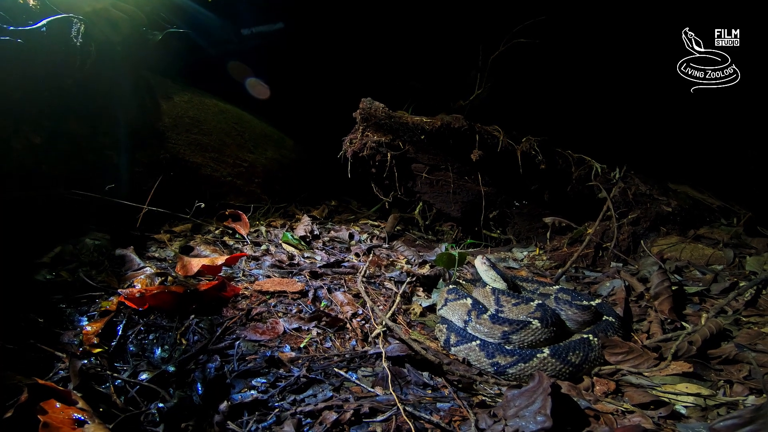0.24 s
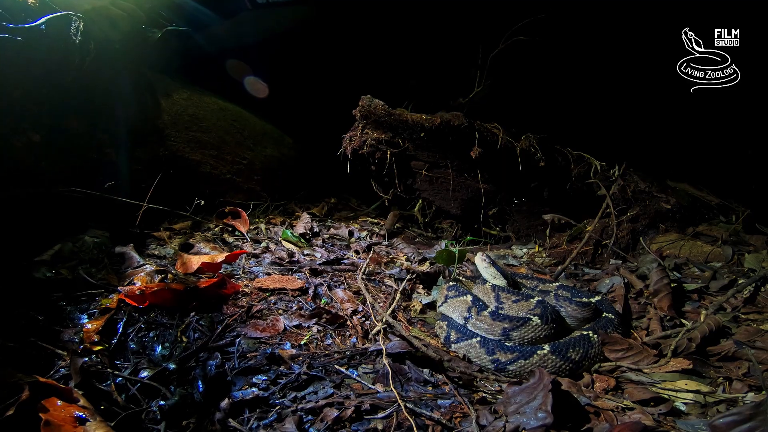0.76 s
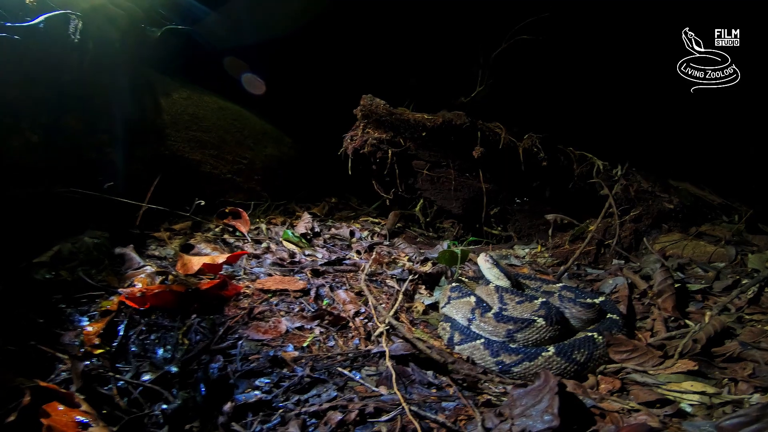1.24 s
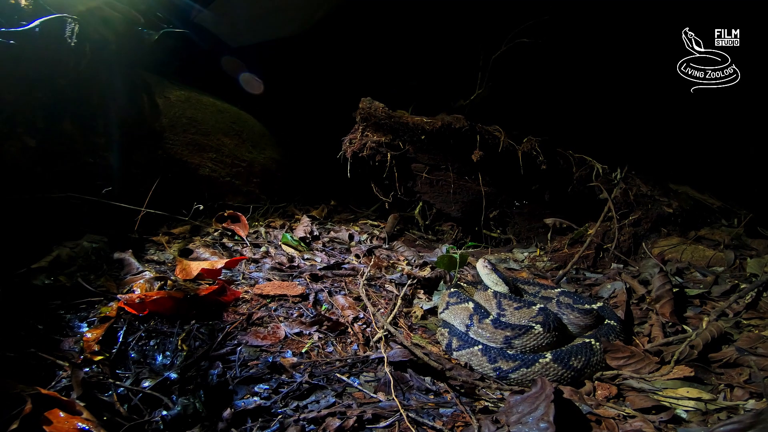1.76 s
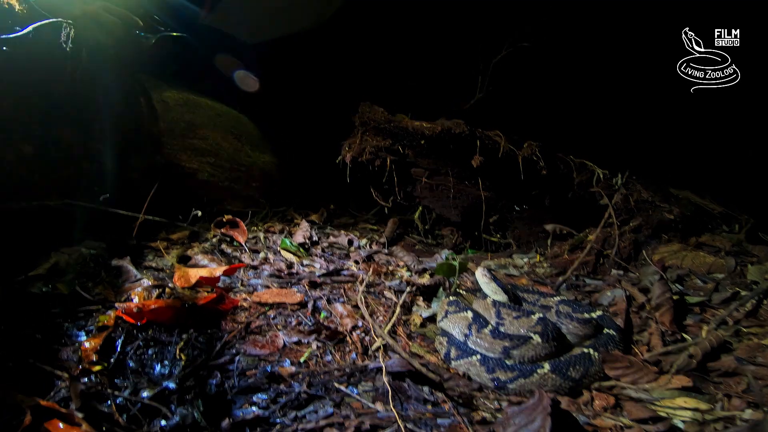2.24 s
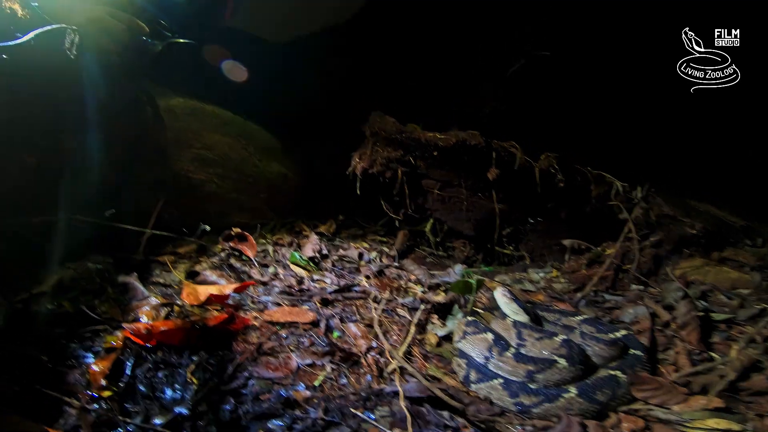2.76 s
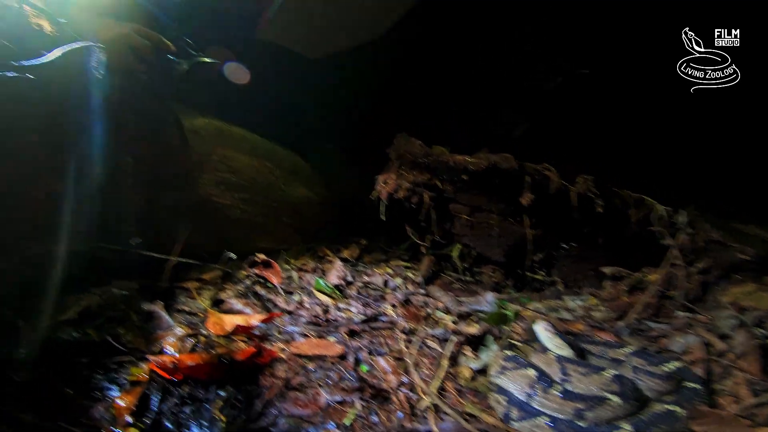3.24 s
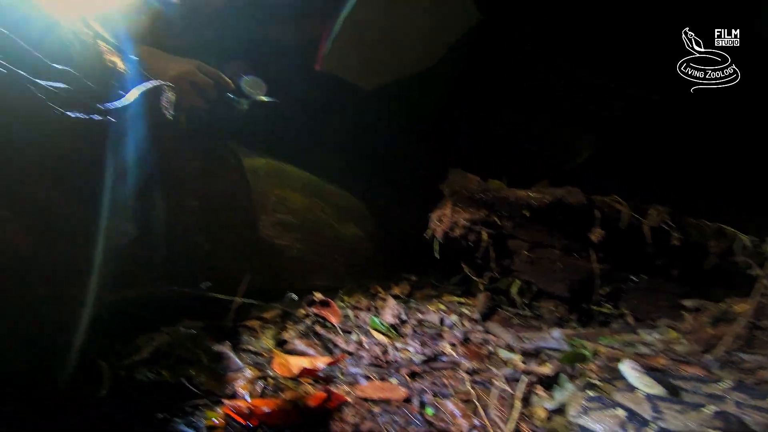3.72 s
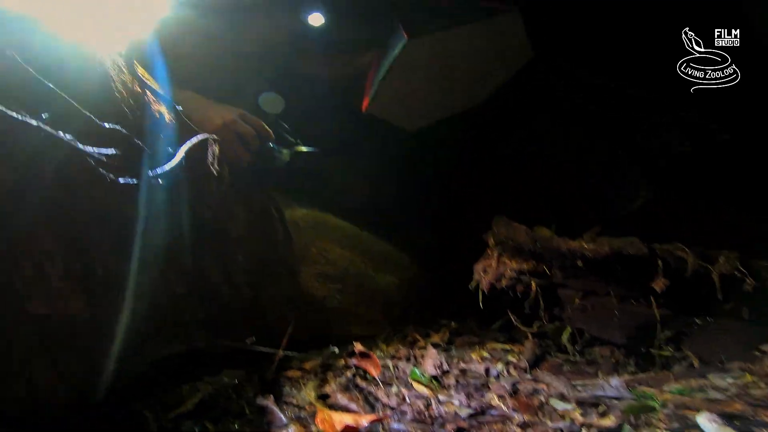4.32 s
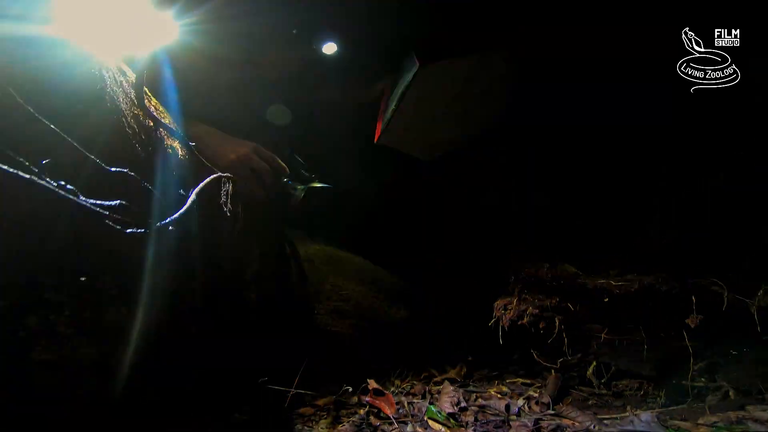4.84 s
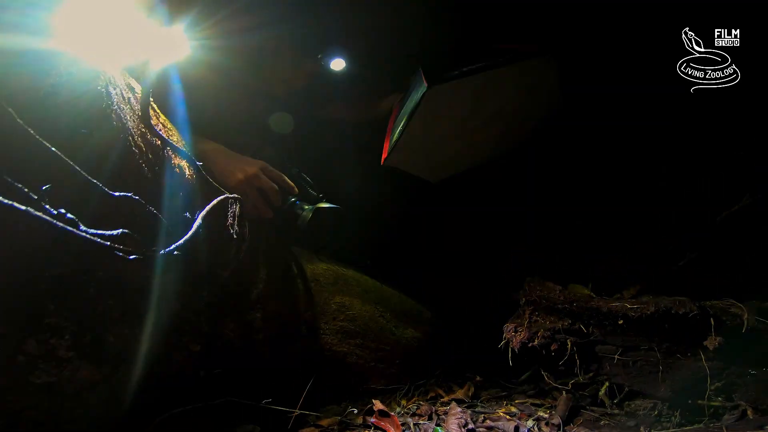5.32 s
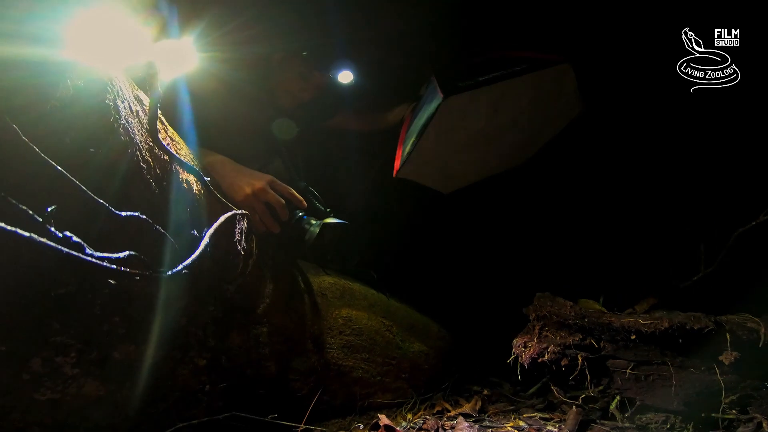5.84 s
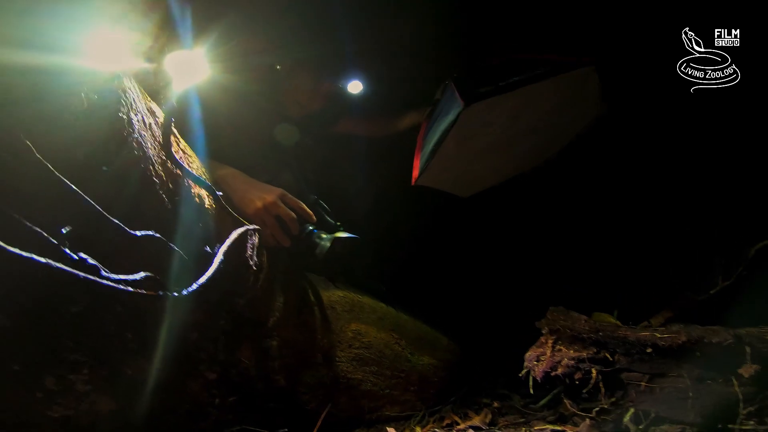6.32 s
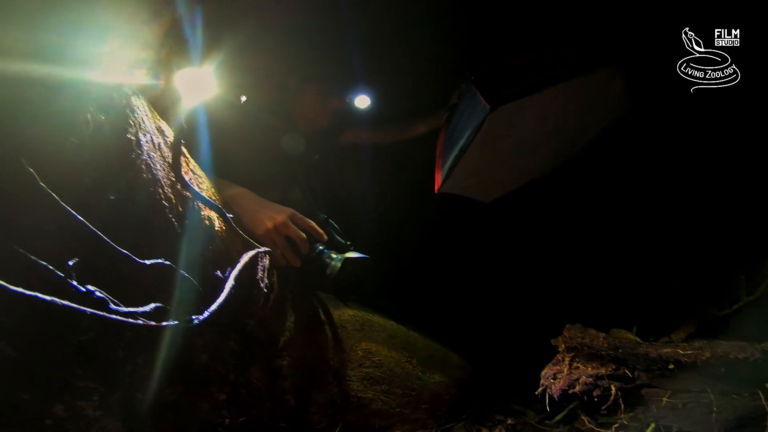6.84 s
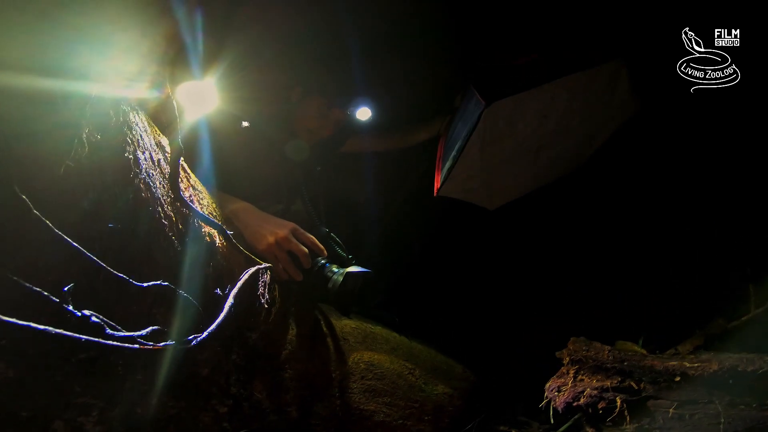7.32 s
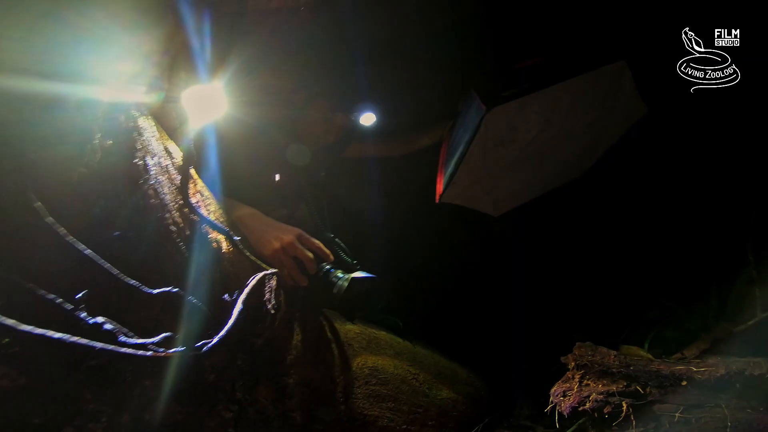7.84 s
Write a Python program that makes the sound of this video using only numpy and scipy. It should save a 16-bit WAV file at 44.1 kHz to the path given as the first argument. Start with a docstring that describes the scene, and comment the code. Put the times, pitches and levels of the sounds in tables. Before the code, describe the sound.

Short, bright frog peeps ring through the undergrowth, singly and in clusters, over pulsing cricket trills and a steady distant wash of night insects. Early on, just past the middle and near the end, a camera close to the microphone whirrs into focus, bumps softly and snaps its shutter. Faint high katydid rasps, thin whistled notes and a few tiny leaf ticks fill out the forest, heard in stereo.

```python
"""A rainforest floor at night, on a stereo microphone. Small frogs peep in the echoing undergrowth,
crickets trill with their wings, other singers whistle, and katydids rasp high above a dense far chorus.
Three times a stills camera close by focuses and fires: its motor whines, the mirror and shutter click,
and the body shakes the microphone."""
import sys
import numpy as np
from scipy import signal
from scipy.fft import rfft, irfft, next_fast_len
from scipy.io import wavfile
from scipy.ndimage import uniform_filter1d, map_coordinates

SR = 44100
rng = np.random.default_rng(int(sys.argv[2]) if len(sys.argv) > 2 else 0)


def put_to_file(sound):
    """Save the sound as 16-bit audio at rate SR, in the file named by the first command-line argument."""
    columns = np.atleast_2d(sound).T  # one column per channel
    safe = np.clip(columns, -1, 1)
    whole_steps = np.round(safe * 32767)
    wavfile.write(sys.argv[1], SR, whole_steps.astype(np.int16))


N = 356328
T = np.arange(N) / SR
SHOT_SIZE, LEAD_S = SR // 2, 0.3  # samples in one camera shot; how long before the release it starts


def amp(db):
    return 10 ** (np.asarray(db) / 20)


def unit(x):
    """x scaled to rms 1."""
    return x / np.sqrt(np.mean(x ** 2) + 1e-20)


def along(points, hz):
    """Reads (f/Hz, value) points at hz on a log frequency axis."""
    f, values = np.transpose(points)
    return np.interp(np.log(hz + 1), np.log(f + 1), values)


def curves(rows, t):
    """Each column after the time column, interpolated at times t."""
    times, *columns = np.transpose(rows)
    return [np.interp(t, times, column) for column in columns]


def wobble(rate):
    """A smooth random curve, rate knots a second."""
    return map_coordinates(rng.standard_normal(int(N * rate / SR) + 4), [T * rate])


def filtered(x, response):
    """x through a complex response of frequency."""
    size = next_fast_len(x.shape[-1] + 8192)
    return irfft(rfft(x, size) * response(np.fft.rfftfreq(size, 1 / SR)), size)[..., :x.shape[-1]]


def resonances(modes):
    """Causal response of (f/Hz, width/Hz, gain/dB) modes of alternating sign."""
    return lambda f: sum((-1) ** k * amp(db) * 1j * f * width / (hz * hz - f * f + 1j * f * width)
                         for k, (hz, width, db) in enumerate(modes))


def band(size, hz, width_hz):
    """Noise in a bell-shaped band, rms 1."""
    return unit(filtered(rng.standard_normal(size), lambda f: np.exp(-((f - hz) / width_hz) ** 2 * 2)))


def warble(size, hz, width_hz):
    """A tone of even level whose pitch trembles, rms 1."""
    start_phase = rng.random() * 2 * np.pi
    pitch = hz + width_hz * wobble(60)[:size]
    return unit(np.sin(start_phase + 2 * np.pi * np.cumsum(pitch) / SR))


def swell(size, edge):
    """A fade in and a fade out, each over the share edge of the length."""
    u = np.linspace(0, 1, size)
    return np.sin(np.pi / 2 * np.clip(np.minimum(u, 1 - u) / edge, 0, 1))


def echo(x, t60):
    """Trunks and leaves scatter the sound into a dense tail of energy 1."""
    t = np.arange(SR // 2) / SR
    tail = rng.standard_normal(len(t)) * amp(-60 * t / t60)
    return signal.fftconvolve(x, tail / np.linalg.norm(tail))


def add(track, s, x):
    """Mixes x into track from second s on."""
    part = track[..., round(s * SR):][..., :x.shape[-1]]
    part += x[..., :part.shape[-1]]


def rush(spectrum, patchy_db):
    """Stereo noise of rms 1 whose gain varies in random patches of time and frequency."""
    # likeness of the microphone's two sides: f/Hz, correlation
    likeness = [(30, 0.91), (120, 0.99), (300, 1), (600, 0.98), (1500, 0.99), (2500, 1), (8500, 1),
                (9500, 0.615), (15000, 0.43)]

    def mid_and_side(hz):
        angle = np.arccos(np.clip(along(likeness, hz), -1, 1)) / 2
        return amp(along(spectrum, hz)) * [np.cos(angle), np.sin(angle)]

    cells = signal.stft(rng.standard_normal((2, N)), nperseg=512)[2]
    patches = uniform_filter1d(rng.standard_normal(cells.shape[1:]), 3, axis=0)
    patches = uniform_filter1d(patches, 14, axis=1)
    pair = signal.istft(cells * amp(patchy_db * unit(patches)), nperseg=512)[1][:, :N]
    mid, side = filtered(pair, mid_and_side)
    return unit(np.array([mid + side, mid - side]))


def forest():
    """Far from the microphone, unseen singers blur into a patchy hiss over the low rustle of night air."""
    # slow drift of the distance: t/s, frog level/dB, chorus level/dB
    drift = [(0, -51, -48), (1, -59.5, -49), (4, -60.5, -49.5), (8.08, -55, -49.5)]
    # spectrum of the far chorus: f/Hz, relative density/dB
    chorus_spectrum = [(1180, -41.5), (2000, -25), (2490, -22.5), (2810, -14), (3500, -15), (4310, 3),
                       (5140, -3), (5370, -10), (5980, 1), (6330, -2.5), (6570, -12), (7310, -6),
                       (7840, -15), (8290, -60.5), (9000, -47), (11700, -67), (19800, -120)]
    # spectrum of the night air: f/Hz, relative density/dB
    air_spectrum = [(20, -120), (30, -13.5), (50, -2.5), (62, -7), (90, -6.5), (200, -1.5), (330, -4),
                    (450, -13), (620, -16), (1500, -19), (3000, -25.5), (8500, -28.5), (15700, -33.5)]
    frogs_db, chorus_db = curves(drift, T)
    far_frogs = amp(frogs_db + 4.1 * wobble(13)) * band(N, 4530, width_hz=480)
    chorus = amp(chorus_db) * rush(chorus_spectrum, patchy_db=2)
    air = amp(-65) * rush(air_spectrum, patchy_db=1.5)
    return far_frogs + chorus + air


def far_singers():
    """Distant voices that never stop, each a trembling tone in a narrow band of noise."""
    # held voices: f/Hz, width/Hz, level/dB
    singers = [(609, 41, -81.5), (2774, 150, -73), (3049, 57, -71), (3269, 58, -69.5), (3523, 50, -74),
               (5340, 22, -69), (5640, 24, -65.5), (5807, 62, -61.5), (7013, 150, -65.5)]
    out = np.zeros(N)
    for hz, width_hz, db in singers:
        level = amp(db + 1.1 * wobble(4.6))
        out += level * 0.7 * (warble(N, hz, width_hz / 2) + band(N, hz, width_hz))
    return out


def steady_cricket():
    """One cricket sings throughout, its wing strokes pulsing in steady groups."""
    groups = (1 + 0.3 * np.sin(2 * np.pi * 20 * T)) * (1 + 0.32 * np.sin(2 * np.pi * 45 * T))
    tone = band(N, 5030, width_hz=28) + 1.1 * warble(N, 5097, width_hz=11)
    return unit(groups * tone) * amp(-58.5 + 0.63 * wobble(1.8))


def cricket_trills():
    """Wing strokes chop a tone, huskier and more echoing the farther the cricket is from the microphone."""
    # trills of the nearer crickets: t/s, f/Hz, level/dB
    near = [(0.047, 6230, -45.5), (0.19, 6160, -49.5), (0.411, 6240, -50), (1.035, 6110, -52.5),
            (1.2, 6220, -54), (1.37, 6140, -55), (1.557, 6240, -48), (1.9, 6264, -46), (2.246, 6254, -47.5),
            (2.67, 6120, -53), (2.9, 6180, -51), (3.33, 6200, -61), (3.62, 6150, -48), (3.687, 6323, -44),
            (4.001, 6250, -48), (4.09, 6270, -46), (4.46, 6305, -45), (4.89, 6000, -50.5),
            (5.27, 6250, -53), (5.608, 6294, -43), (6, 6280, -45.5), (6.16, 6200, -57), (6.44, 6140, -50.5),
            (6.78, 6180, -53), (7.664, 6310, -45.5)]
    trill_s, strokes_per_s, far_count = 0.154, 51, 20
    far = zip(rng.uniform(0, N / SR, far_count),
              rng.normal(6190, 44, far_count),
              rng.normal(-56.5, 2.5, far_count))  # same columns, drawn at random
    out, t = np.zeros(N), T[:round(trill_s * SR)]
    for start, hz, db in [*near, *far]:
        blur = amp(min(-2 + 0.83 * (-46 - db), 5))  # husk and echo grow as the trill gets fainter
        strokes = np.clip(0.7 - np.cos(2 * np.pi * rng.normal(strokes_per_s, 0.41) * t), 0, 1.3)
        tone = np.sin(2 * np.pi * hz * t) + blur * band(len(t), hz, width_hz=110)
        trill = amp(db) * swell(len(t), edge=0.1) * unit(strokes * tone) / np.hypot(1, blur)
        add(out, start, trill)
        add(out, start, blur * echo(trill, t60=0.24))
    return out


def frogs():
    """Each peep starts high, flips down to a held pitch and hangs in the echoes; far ones start softly."""
    # peeps in the undergrowth: t/s, level/dB, held f/Hz, echo over the peep/dB
    peeps = [(0.069, -28, 4350, 0), (0.091, -27.5, 4337, 0.5), (0.287, -47, 4220, 8), (0.53, -41, 4385, 5),
             (0.7, -40, 4240, 4.5), (1.035, -24, 4335, 5.5), (1.638, -30, 4280, 2.5),
             (1.719, -34.5, 4250, 5.5), (1.8, -42, 4060, 9), (1.996, -23.5, 4094, -2.5),
             (2.668, -51.5, 4100, 12), (2.743, -46.5, 4430, 7), (2.979, -30.5, 4010, 5),
             (3.355, -44, 4350, 7), (3.48, -40, 4423, 7.5), (3.512, -42.5, 4050, 8.5),
             (3.741, -39, 4220, 6), (3.785, -31.5, 4306, 2), (4.071, -37, 4207, 9), (4.298, -40, 4410, 4.5),
             (4.707, -34, 4200, 4.5), (5.152, -41.5, 4360, 6), (5.179, -38, 3955, 6),
             (5.201, -31.5, 4004, 1), (5.25, -43.5, 3980, 8), (5.451, -25, 4350, 2), (5.475, -28, 4390, -1),
             (5.506, -25, 4197, 1), (5.672, -40.5, 4240, 6), (6.02, -43.5, 4295, 8), (6.07, -44, 4140, 7),
             (6.402, -37, 4100, 7), (6.806, -43.5, 4160, 8), (7.263, -41.5, 4415, 7.5),
             (7.423, -34.5, 4320, 7), (7.549, -29.5, 4375, 4), (7.693, -23.5, 4110, -2)]
    peep_s, peep_t60, trunk_delay_s = 0.038, 0.11, 0.019
    out, t = np.zeros(N), T[:round(peep_s * SR)]
    flip_hz = 190 * (1 - np.tanh((t - 0.006) / 0.0015))
    for s, db, hz, echo_db in peeps:
        phase = 2 * np.pi * np.cumsum(hz + flip_hz) / SR
        rise_s = 0.001 * amp(1.16 * echo_db)
        envelope = np.clip(t / rise_s, 0, 1) * swell(len(t), edge=0.023) * amp(-60 * t / peep_t60)
        peep = envelope * (np.sin(phase) + amp(-43) * np.sin(2 * phase))
        trunk_db = db - 5 + min(echo_db, 5.5)  # a trunk throws every peep back once
        add(out, s, amp(db) * peep)
        add(out, s + trunk_delay_s, amp(trunk_db) * peep)
        add(out, s + 0.003, amp(db + echo_db) * echo(peep, t60=0.42))
    return out


def whistles():
    """Short, breathy notes of single singers, heard directly and through the trees."""
    # whistled notes: t/s, length/s, f/Hz, level/dB before the direct and echo gains
    notes = [(0.415, 0.11, 2373, -61.5), (0.547, 0.045, 3280, -48), (0.78, 0.11, 2385, -62),
             (1.475, 0.021, 3290, -49), (5.38, 0.072, 2200, -71), (5.8, 0.087, 2220, -69),
             (6.39, .07, 2170, -65), (6.56, .08, 2116, -68), (7.058, 0.097, 2120, -71),
             (7.327, 0.081, 2130, -66), (7.452, 0.11, 2130, -67), (7.87, .09, 2120, -68)]
    out = np.zeros(N)
    for start, length, hz, db in notes:
        t = T[:round(length * SR)]
        tone = np.sin(2 * np.pi * hz * t) + 0.5 * band(len(t), hz, width_hz=89)
        note = amp(db) * swell(len(t), edge=0.22) * unit(tone)
        add(out, start, 0.48 * note)
        add(out, start, 0.38 * echo(note, t60=0.4))
    return out


def katydid_rasps():
    """Katydids scrape out bursts of high, throbbing hiss that arrive more as echo than directly."""
    # bursts: start t/s, end t/s, centre f/Hz, width/Hz, level/dB before the direct and echo gains
    rasps = [(0.97, 1.117, 15500, 700, -77.5), (1.633, 1.7, 13600, 900, -83),
             (1.756, 1.94, 15300, 900, -72.5), (1.947, 2.502, 14500, 2510, -80.5),
             (2.465, 2.74, 10500, 2200, -78.5), (3.33, 3.832, 12300, 4560, -66.5),
             (3.682, 3.9, 13100, 700, -80), (7.072, 7.354, 15500, 890, -75)]
    out = np.zeros(N)
    throb = 1 - 0.2 * np.cos(2 * np.pi * 10 * T)
    for start, end, hz, width_hz, db in rasps:
        size = round((end - start) * SR)
        add(out, start, amp(db) * swell(size, edge=0.3) * throb[:size] * band(size, hz, width_hz))
    return 0.63 * out + 0.85 * echo(out, t60=0.5)[:N]


def cricket_pips():
    """Slower wing strokes part a cricket's tone into five pips with a short echo."""
    # runs of pips: t/s, level/dB before the direct and echo gains
    runs = [(1.02, -61), (4.43, -61.5)]
    hz, pips_per_s = 3700, 27
    out, t = np.zeros(N), T[:round(5 / pips_per_s * SR)]
    strokes = np.clip(0.2 - np.cos(2 * np.pi * pips_per_s * t), 0, 1)
    for start, db in runs:
        tone = np.sin(2 * np.pi * hz * t) + 0.3 * band(len(t), hz, width_hz=58)
        pips = amp(db) * unit(strokes * tone)
        add(out, start, 0.85 * pips)
        add(out, start, 0.6 * echo(pips, t60=0.14))
    return out


def leaf_ticks():
    """Tiny dry ticks in the leaves: bright noise that dies at once."""
    # ticks: t/s, starting level/dB
    ticks = [(1.337, -57), (5.862, -61.5), (6.0033, -61)]
    out, size, t60 = np.zeros(N), 300, 0.006
    for s, db in ticks:
        add(out, s, amp(db - 60 * T[:size] / t60) * band(size, 12000, width_hz=6000))
    return out


def lens_motor():
    """The focus motor whirrs and whines through one shot, with a narrow band of gear noise."""
    # run of the motor: t/s from release, whirr level/dB, gear level/dB
    drive = [(-.28, -81, -94), (-.22, -43, -86), (-.17, -41.5, -41.5), (-.1, -39.5, -44),
             (-.04, -39.5, -53), (0.071, -40.5, -59), (.13, -91, -99)]
    # spectrum of the whirr: f/Hz, relative density/dB before the stereo mix
    spectrum = [(59, -48), (100, -8), (183, -7.5), (430, -29), (780, -24.5), (1200, -34), (2150, -38.5),
                (3710, -28.5), (4480, -4), (5210, -24.5), (5520, -7), (6180, -4), (6500, -13.5),
                (9000, -63.5), (11700, -96), (19800, -120)]
    # motor tones: start t/s, end t/s (both from release), f/Hz, level/dB
    whines = [(-.26, -0.03, 5590, -44), (-.22, -.07, 6218, -45), (-.16, -.075, 4322, -55),
              (.035, .07, 5705, -50)]
    whirr_db, gear_db = curves(drive, T[:SHOT_SIZE] - LEAD_S)
    mid, side = filtered(rng.standard_normal((2, SHOT_SIZE)), lambda hz: amp(along(spectrum, hz)))
    mid = filtered(mid, lambda hz: np.where(hz < 1500, 0.35, 0.9))  # the lows are mostly out of phase
    whirr = amp(whirr_db) * unit(np.array([mid + side, mid - side]))
    gears = amp(gear_db) * band((2, SHOT_SIZE), 4660, width_hz=260)
    out = whirr + gears
    for start, end, hz, db in whines:
        size = round((end - start) * SR)
        tones = np.array([warble(size, hz, width_hz=14) for _ in range(2)])
        add(out, LEAD_S + start, amp(db) * swell(size, edge=0.2) * tones)
    return out


def body_shake():
    """Each jolt of a shot rocks and rattles the camera body, shaking the microphone until a hand damps it."""
    # jolts: t/s from release, level/dB, rattle gain over the sway/dB, length/s
    jolts = [(-.25, -51, 1, .115), (-.185, -40, -7.5, 0.13), (-.065, -37, -13.5, .1),
             (.022, -36.5, 1.5, .085)]
    # rattling modes of the body: f/Hz, relative level/dB, t60/s, right over left/dB
    modes = [(42, -6, 0.23, 4.5), (85, -5.5, 0.12, 9), (121.3, -8, 0.1, 10.5), (171, -11.5, 0.093, 8.5)]
    t = T[:SR // 5]

    def ring(hz, db, t60, right_db, right_lag_rad=0):
        envelope = amp(db - 60 * t / t60 + np.c_[[0, right_db]])
        return envelope * np.sin(2 * np.pi * hz * t - np.c_[[0, right_lag_rad]])

    sway = ring(hz=21.4, db=0, t60=0.35, right_db=4.5, right_lag_rad=0.54)
    rattle = sum(ring(*mode) for mode in modes)
    out = np.zeros((2, SHOT_SIZE))
    for s, db, rattle_db, length in jolts:
        size = round(length * SR)
        motion = sway + amp(rattle_db) * rattle
        add(out, LEAD_S + s, amp(db) * swell(size, edge=0.14) * motion[:, :size])
    return out


def shutter_clicks():
    """Mirror and shutter strike in quick succession: each blow rings the housing and scrapes the latch."""
    # strikes: t/s from release, knock gain/dB, snap gain/dB
    clacks = [(-.022, -8, -14), (-.003, -18, -11), (.002, 15.5, -11), (.006, -7, -2), (.011, -18, -6),
              (0.06, -16, -9.5), (0.066, -6, -13)]
    # modes of the housing: f/Hz, width/Hz, gain/dB
    housing = [(800, 400, -13.5), (1350, 200, -15), (2890, 280, 5)]
    # modes of the latch: f/Hz, width/Hz, gain/dB
    latch = [(5900, 1100, 9), (7900, 830, 0)]
    size, blow_t60, scrape_t60 = 1200, 0.0005, 0.013
    out, t = np.zeros((2, SHOT_SIZE)), T[:size]
    for s, knock_db, snap_db in clacks:
        blow = amp(-60 * t / blow_t60) * (0.7 + 0.3 * rng.standard_normal((2, size)))
        grit = rng.standard_normal(size) + rng.standard_normal((2, size))  # half shared by both sides
        scrape = 0.6 * amp(-60 * t / scrape_t60) * grit
        add(out, LEAD_S + s, amp(knock_db) * filtered(blow, resonances(housing)))
        add(out, LEAD_S + s, amp(snap_db) * filtered(scrape, resonances(latch)))
    out = filtered(out, lambda f: amp(-27) + 1 / (1 + (f / 8200) ** 10))  # little above the top mode
    return out + amp(-3) * np.array([echo(side, t60=0.11)[:SHOT_SIZE] for side in out])


def camera():
    """One camera close to the microphone, wide in stereo: the same whirr, shake and clicks each time."""
    # shutter releases: t/s, click gain/dB
    shots = [(1.8877, -23.5), (4.866, -24), (7.585, -23)]
    motor, shake, clicks = lens_motor(), body_shake(), shutter_clicks()
    out = np.zeros((2, N))
    for s, db in shots:
        add(out, s - LEAD_S, motor + shake + amp(db) * clicks)
    return out


def litter_taps():
    """Dull taps on the leaf litter: short, quickly damped bursts of midrange noise."""
    # taps: t/s, starting level/dB
    taps = [(2.24, -58), (5.241, -62)]
    out, size, t60 = np.zeros(N), 900, 0.041
    for s, db in taps:
        add(out, s, amp(db - 60 * T[:size] / t60) * band(size, 1230, width_hz=1100))
    return out


def slow_katydid():
    """One katydid scrapes in even beats, fading in and out over a single spell."""
    beats_per_s = 4.99
    spell = np.exp(-((T - 3.65) / 1.14) ** 6)
    beats = spell * np.clip(np.cos(2 * np.pi * beats_per_s * (T - 3.55)), 0, 1)
    return amp(-57.5) * beats ** 1.1 * band(N, 7293, width_hz=320)


def scene():
    """Single callers sit in the centre; the forest and the close camera give the stereo width."""
    centre = far_singers() + steady_cricket() + cricket_trills() + frogs() + whistles()
    centre += katydid_rasps() + cricket_pips() + leaf_ticks() + litter_taps() + slow_katydid()
    return forest() + centre + camera()


def record(dry):
    """The microphone keeps nothing above its band limit."""
    top_hz = 15730
    return filtered(dry, lambda hz: hz < top_hz)


dry = scene()
out = record(dry)
put_to_file(out)
```